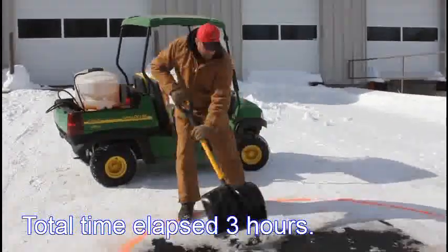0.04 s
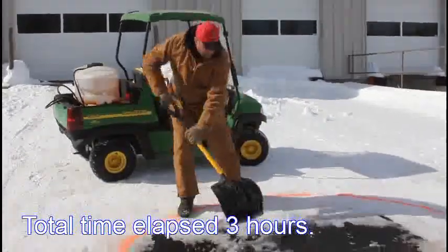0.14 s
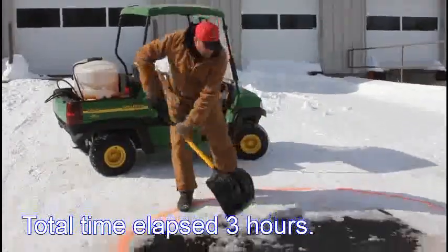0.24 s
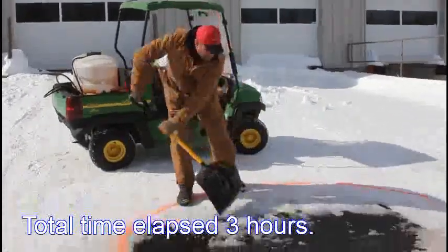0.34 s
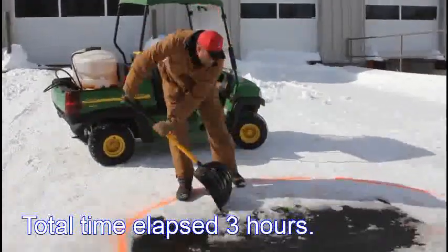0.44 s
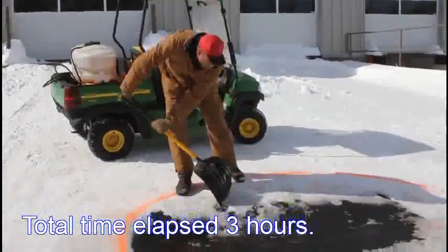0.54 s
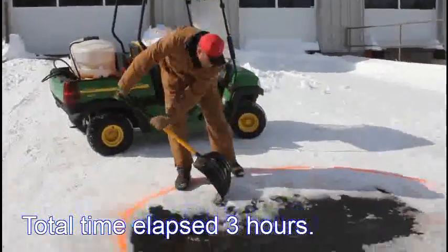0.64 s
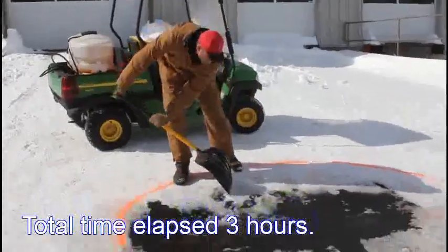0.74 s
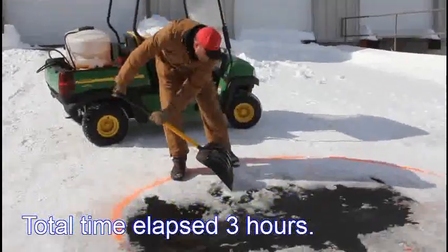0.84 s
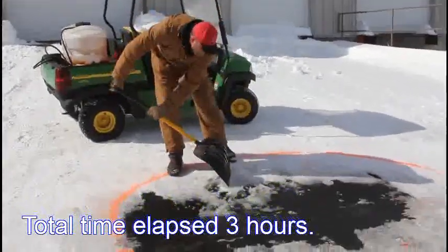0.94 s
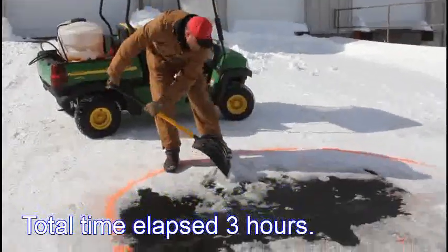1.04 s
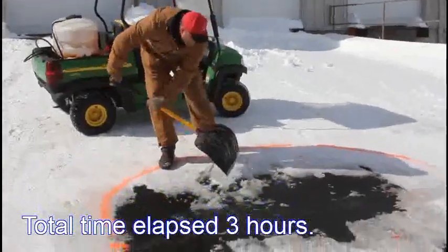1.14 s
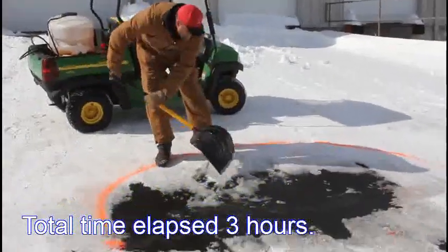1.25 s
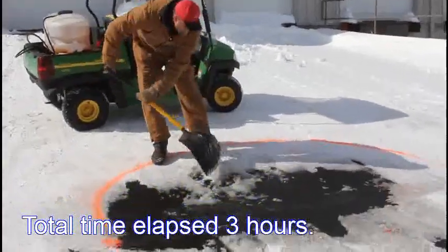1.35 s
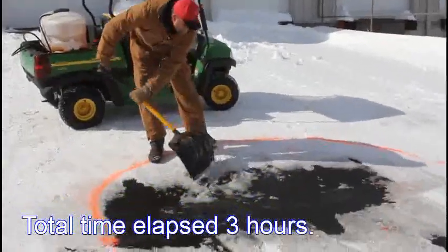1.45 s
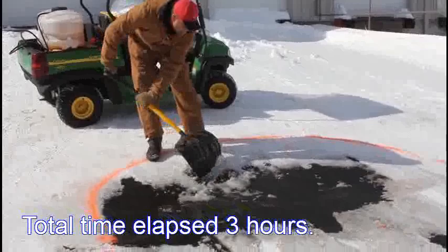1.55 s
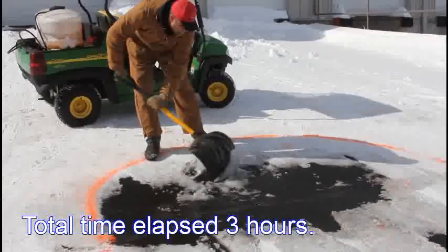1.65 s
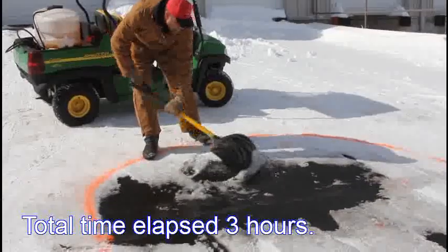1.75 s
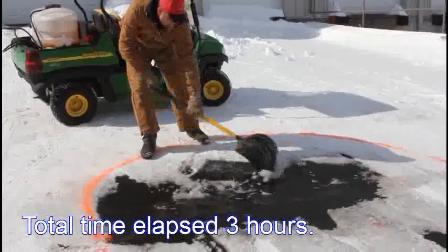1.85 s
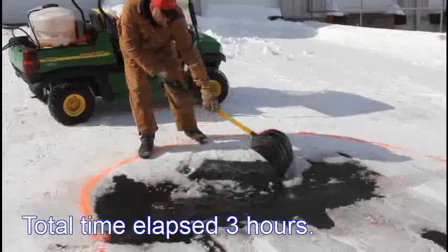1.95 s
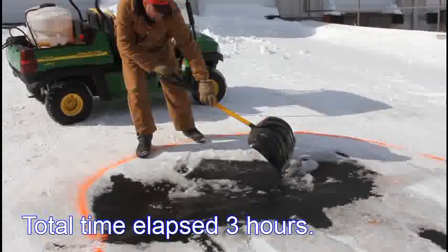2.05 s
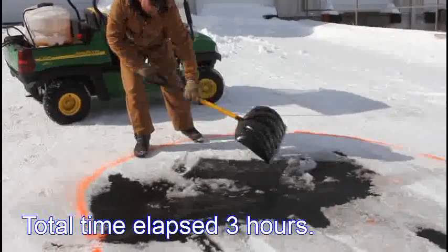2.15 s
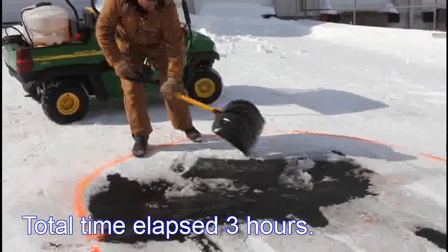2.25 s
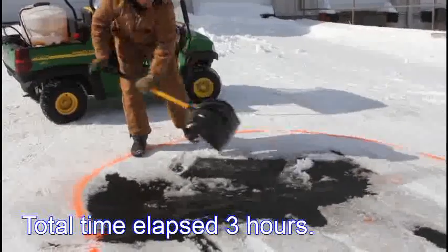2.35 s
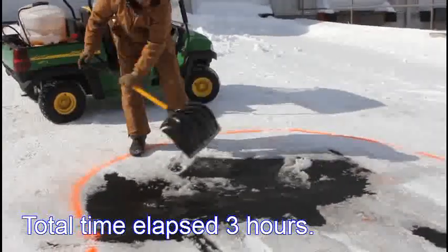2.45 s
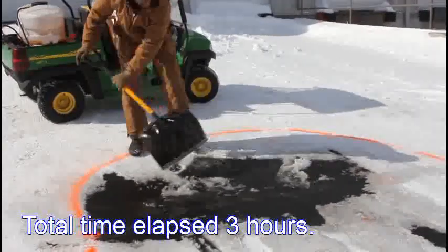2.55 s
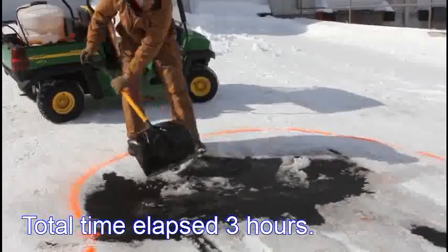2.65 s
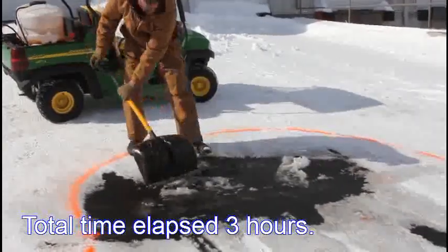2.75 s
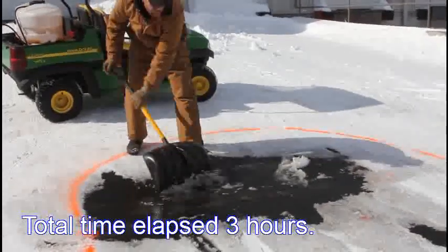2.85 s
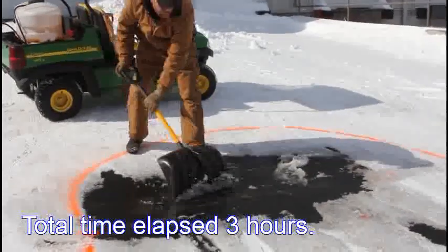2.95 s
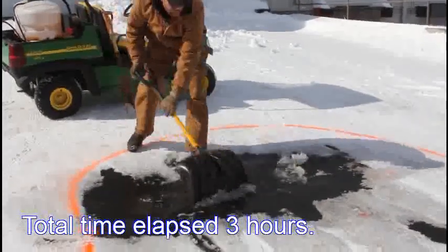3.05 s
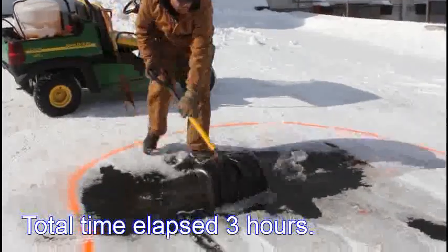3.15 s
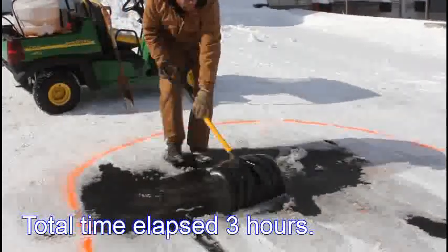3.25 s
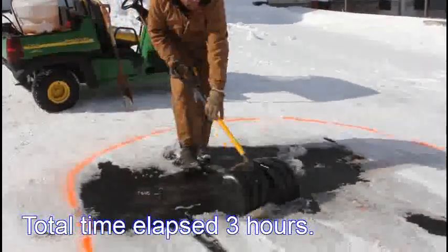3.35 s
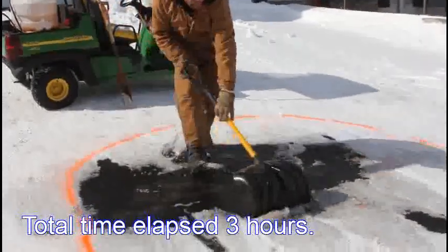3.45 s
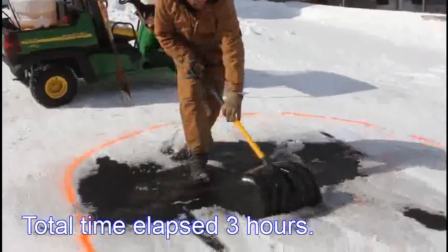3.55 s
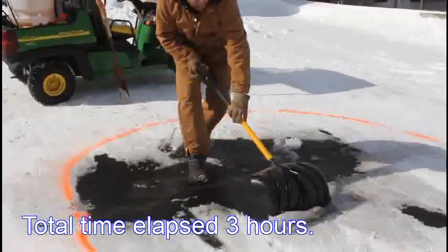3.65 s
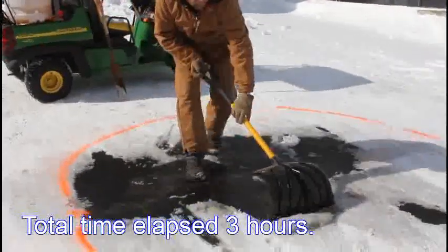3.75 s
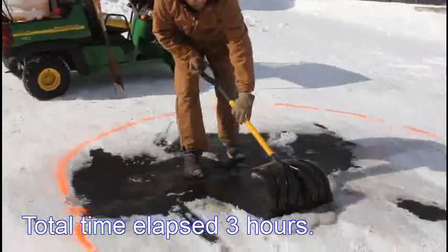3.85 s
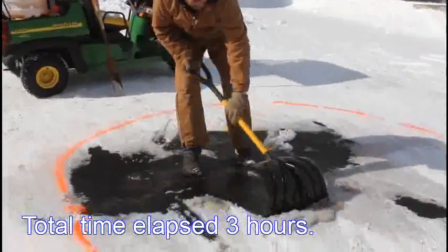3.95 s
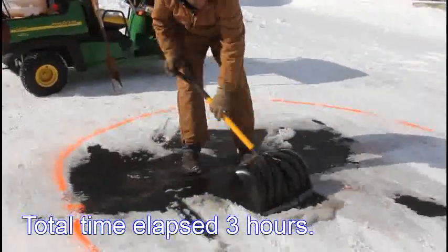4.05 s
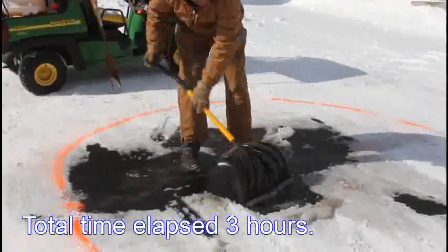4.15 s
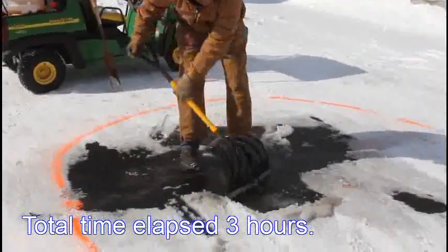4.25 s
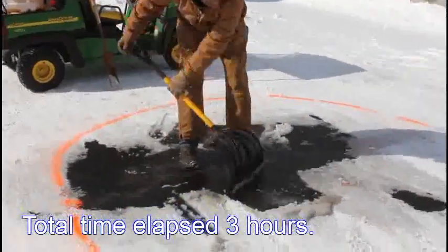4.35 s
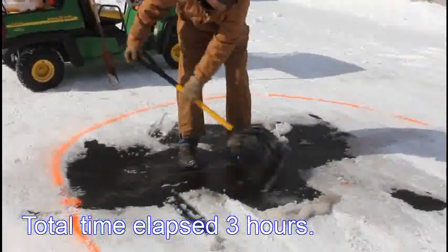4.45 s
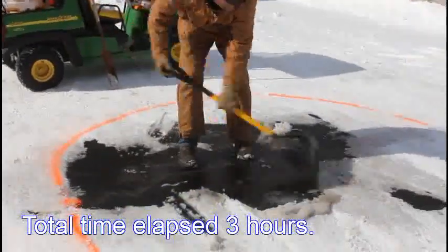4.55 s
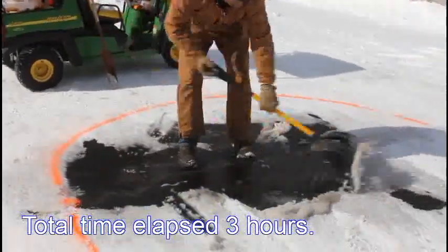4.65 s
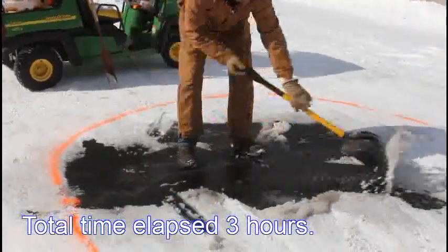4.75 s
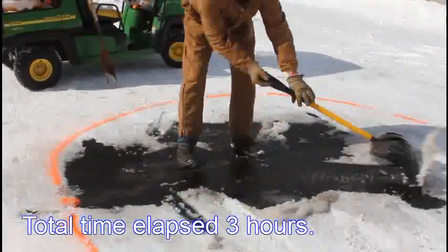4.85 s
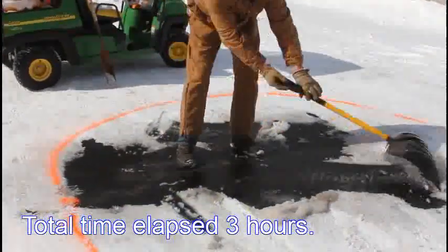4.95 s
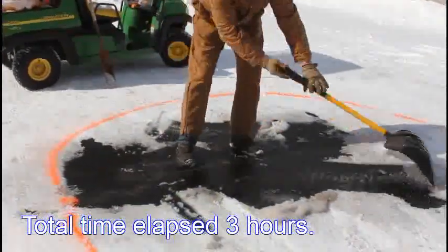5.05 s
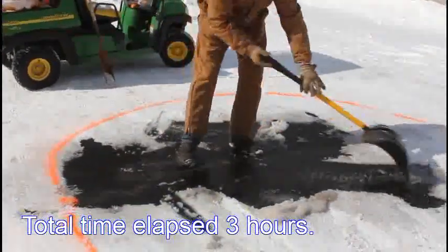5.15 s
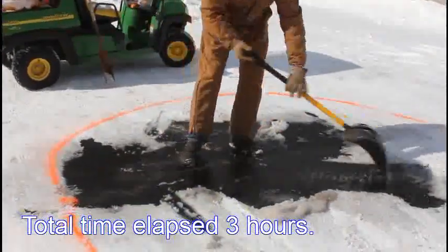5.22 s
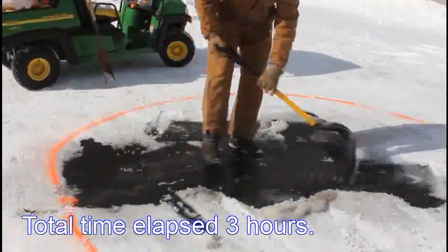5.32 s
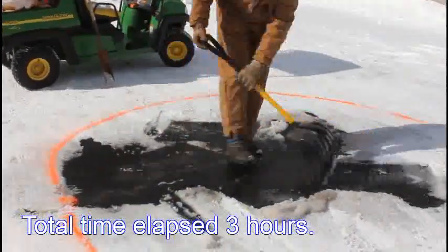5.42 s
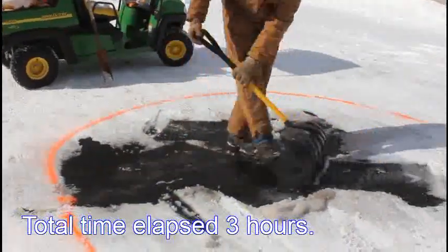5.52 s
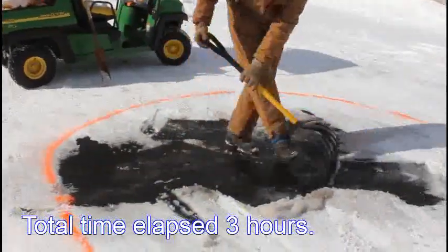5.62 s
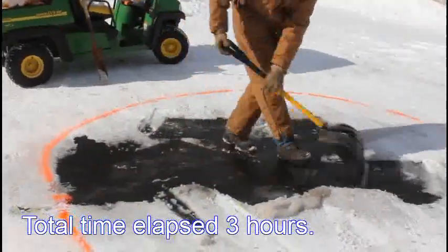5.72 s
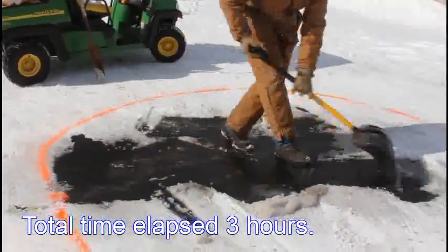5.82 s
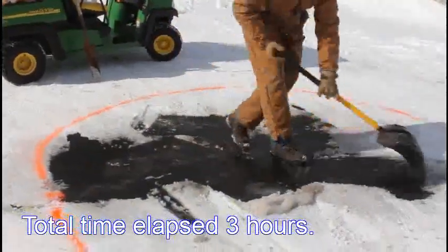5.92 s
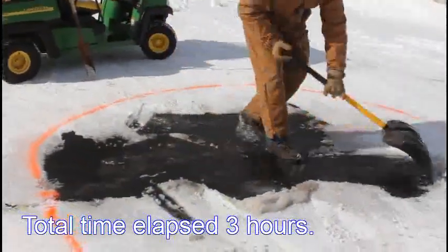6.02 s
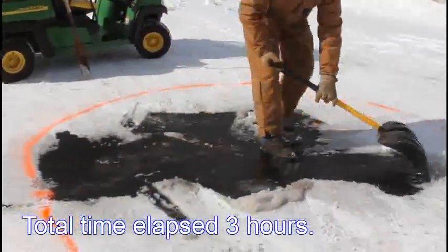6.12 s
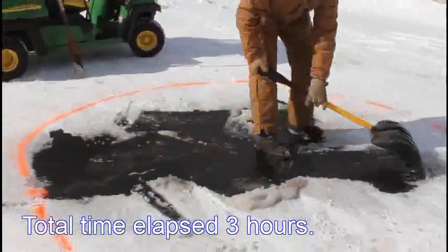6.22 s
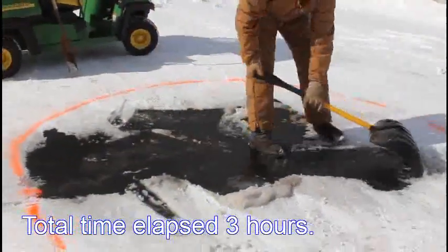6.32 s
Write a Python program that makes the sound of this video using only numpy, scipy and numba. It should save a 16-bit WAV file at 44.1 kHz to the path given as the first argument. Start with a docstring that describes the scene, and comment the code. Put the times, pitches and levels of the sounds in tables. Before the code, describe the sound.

A wide plastic scoop works slush off wet asphalt. Wind rumble and fabric rub come first, then a knock and brief scrape, dry clicks with tiny squeaks, a second short rasp, quiet ticking, and a hard clipped smack starting a long scrape. Several stuttering scrapes and a final hollow push follow. Camera microphone in the open air, wind-buffeted, dull at the top, no reverberation.

```python
"""Wind buffets the microphone and a work jacket swishes before a plastic scoop shovel lands on wet asphalt.
It is pushed in long strokes through slush and soft ice: the edge catches and slips on grit, a random
force that rings the modes of the hollow blade and its lip. Hard landings are contact pulses that overload
the recorder before its gain control reacts. Dry ticks close by are short damped tones with noise bursts,
brief squeaks are unsteady sines, and wind, cloth and open air are filtered noise."""
import sys
import numpy as np
from scipy import signal
from scipy.fft import rfft, irfft, next_fast_len
from scipy.io import wavfile
from scipy.ndimage import uniform_filter1d
from numba import njit

SR = 44100
rng = np.random.default_rng(int(sys.argv[2]) if len(sys.argv) > 2 else 0)


def wav_out(sig):
    """Save sig, one row per channel (or a flat mono array), as 16-bit PCM at SR to the path in sys.argv[1]."""
    wavfile.write(sys.argv[1], SR, np.round(np.clip(np.atleast_2d(sig).T, -1, 1) * 32767).astype(np.int16))


N = 281256
T = np.arange(N) / SR  # time axis [s]

# pushes of the shovel: (start [s], turning point of the force [s], end [s], relative level there [dB],
# rise up to the turning point, negative for a fall [dB], fall after it, negative for a rise [dB],
# relative boom of the scoop [dB], relative rasp of the edge [dB],
# loss of boom from start to end as the scoop tips, negative for a gain [dB],
# chatter [0-1], lip pitch at start [Hz], lip pitch at end [Hz], relative lip ring [dB])
PUSHES = [(0.614, 0.856, 0.975, -29, 12, 11, 5, 1, -10, 0.31, 800, 930, 5),
          (1.634, 1.892, 2.001, -20, 5.5, 5, 2, -4, 14.5, 0.43, 866, 1060, -2.5),
          (2.926, 3.24, 3.857, -23.8, -2, 2.5, 4.5, -4, -5, 0.37, 2920, 2060, -4),
          (4.041, 4.057, 4.085, -40, -1, 2, 6.5, -5.5, -2, 0.42, 1200, 1190, -1),
          (4.1, 4.12, 4.175, -29, -3, 2.5, 2.5, -6.5, -5, 0.65, 1270, 1130, 7.5),
          (4.227, 4.245, 4.5, -32.5, 0.5, 2, 3, -2, -4, .68, 770, 730, 1.5),
          (4.534, 4.6, 4.625, -20.5, 3, -4.5, 0.5, -4.5, 4, 0.39, 734, 760, 2),
          (4.638, 4.704, 5.11, -16.5, 2.5, 18, 1.5, -7, -1.5, 0.6, 1450, 2460, -1),
          (5.404, 5.422, 5.49, -44.5, 2.5, 8, 0.5, -7.5, 2, 0.27, 1490, 1490, -11),
          (5.686, 5.82, 6.154, -21.5, 4.5, 8.5, 2.5, -1.5, -2, 0.47, 745, 890, -5),
          (6.165, 6.227, 6.39, -30.5, 7, 16.5, 2, -3.5, -1, 0.47, 900, 980, -7)]
BITE_S, LIFT_S = 0.012, 0.0085  # time constants of the edge biting in and lifting off


def undb(db):
    """Definition of the decibel: amplitude gain is 10 to the power dB / 20."""
    return 10 ** (np.asarray(db) / 20)


def unit(x):
    """Normalisation by effective value: scale to rms 1."""
    return x / np.sqrt(np.mean(x ** 2))


def colour(x, points):
    """Minimum-phase filtering: folding the cepstrum of a (Hz, dB) gain curve makes it causal."""
    size = next_fast_len(len(x) + 8192, real=True) // 2 * 2
    hz, db = np.transpose(points)
    bin_hz = np.arange(size // 2 + 1) * SR / size
    gain_db = np.interp(np.log(bin_hz + 1), np.log(hz), db)
    cepstrum = irfft(np.log(undb(gain_db)))
    cepstrum[1:size // 2] *= 2
    cepstrum[size // 2 + 1:] = 0
    response = np.exp(rfft(cepstrum))
    return irfft(rfft(x, size) * response)[:len(x)]


def below(x, hz):
    """Zero-phase low-pass: filtering forwards and backwards cancels the delay."""
    return signal.sosfiltfilt(signal.butter(3, hz, fs=SR, output="sos"), x)


def walk(rate):
    """Slow random modulation: new normal levels at the given rate [1/s], joined by ramps, rms near 1."""
    hold = int(SR / rate)
    steps = np.repeat(rng.standard_normal(N // hold + 1), hold)
    return unit(uniform_filter1d(steps, hold)[:N])


def clicks(rate, spread_db):
    """Poisson-like impacts: clicks at random moments (rate per s), of uneven size."""
    struck = rng.random(N) < rate / SR
    return struck * undb(spread_db * np.clip(rng.standard_normal(N), -2, 2))


def add(out, s, sound):
    """Superposition: mix a short sound in at time s."""
    i = int(s * SR)
    out[i:i + len(sound)] += sound[:N - i]


@njit
def resonate(x, hz, width):
    """Driven damped oscillator: a state-variable band-pass with a moving centre and peak gain 1."""
    y, band, low = np.empty(len(x)), 0., 0.
    for i in range(len(x)):
        g, k = np.pi * hz[i] / SR, width / hz[i]
        v = (band + g * (x[i] + 1e-18 - low)) / (1 + g * (g + k))
        band, low, y[i] = 2 * v - band, low + 2 * g * v, k * v
    return y


@njit
def follow(size, attack, release):
    """Peak detection with two time constants: the envelope rises quickly and sinks slowly."""
    out, e = np.empty(len(size)), 0.
    for i in range(len(size)):
        e += (size[i] - e) * (attack if size[i] > e else release)
        out[i] = e
    return out


def swell(s, db, rise, fall, roundness):
    """Stretched-exponential envelope: gain grows to its top at time s and dies away again."""
    return undb(db) * np.exp(-np.maximum((s - T) / rise, (T - s) / fall) ** roundness)


def across(first, last):
    """Linear motion of a control from its first to its last value during each push."""
    start, _, end = np.transpose(PUSHES)[:3]
    return np.interp(T, np.ravel([start, end], "F"), np.ravel([first, last], "F"))


def yard():
    """Ambient noise: the faint open air over snow is broadband noise with a slowly wandering level."""
    # spectrum of the open air: (frequency [Hz], relative level [dB])
    air_spectrum = [(18, -26), (30, -13), (59, -3.5), (86, -18), (127, -4), (228, -17.5), (430, -11.5),
                    (3520, -27.5), (10300, -42), (13400, -76), (22000, -120)]
    air = unit(colour(rng.standard_normal(N), air_spectrum))
    return undb(-55.5) * air * undb(1.2 * walk(5.4))


def gusts():
    """Addition of independent powers: separate gusts rise out of a wandering breeze."""
    # gusts on the microphone: (strongest at [s], relative level [dB], rise and fall [s])
    gust_rows = [(0.0, -27, 0.023), (0.2, -30.5, 0.12), (0.43, -20, 0.085), (0.512, -13.5, 0.059),
                 (0.689, -21.5, 0.04), (0.83, -32.5, 0.16), (1.32, -39, 0.15), (1.565, -22, 0.027),
                 (2.63, -37.5, 0.093), (2.77, -30.5, 0.027), (3.019, -32.5, 0.12), (4.0, -39, 0.023),
                 (4.11, -46, .03), (4.43, -37.5, .06), (4.53, -33, 0.018), (4.95, -49, .2),
                 (5.27, -35.5, 0.038), (5.63, -39, 0.043), (6.29, -26.5, .025), (6.38, -26.5, 0.061)]
    breeze = undb(-59 + 5 * walk(9))
    gust_power = sum(swell(s, db, width, width, roundness=1.2) ** 2 for s, db, width in gust_rows)
    return np.sqrt(breeze ** 2 + gust_power)


def wind(eddy_db=-2):
    """Turbulent pressure at the microphone: gusts rumble; the strongest also shed smaller, faster eddies."""
    # spectrum of the rumble: (frequency [Hz], relative level [dB])
    rumble_spectrum = [(15, -23.5), (35, 0.5), (70, 1.5), (130, -2.5), (200, -10.5), (350, -33),
                       (700, -59.5), (2000, -56)]
    gust = gusts()
    rumble = unit(colour(rng.standard_normal(N), rumble_spectrum))
    # level the rumble so that the gust sets its strength
    rumble /= np.sqrt(uniform_filter1d(rumble ** 2, int(0.094 * SR)) + 0.024)
    eddy_spectrum = [(60, -1.5), (150, 4.5), (300, 0.0), (520, -9), (1000, -39.5), (3000, -59.5)]
    eddies = unit(colour(rng.standard_normal(N), eddy_spectrum))
    eddy_gain = undb(eddy_db) * (gust / gust.max()) ** 0.84
    return gust * (undb(1.0) * rumble + eddy_gain * eddies)


def swish(rub_width_hz=220):
    """Friction noise: canvas rubs on canvas as the arms swing, and the blade is drawn lightly back."""
    # swishes and light dragging: (strongest at [s], relative level [dB], rise [s], fall [s],
    # nominal pitch of the rub [Hz], relative rub level [dB])
    swish_rows = [(0.29, -43, 0.28, 0.41, 2200, 6), (1.09, -52, 0.017, 0.036, 1500, -13),
                  (1.42, -59.5, 0.17, .15, 1300, -6), (1.6, -47, 0.035, .04, 1500, -10),
                  (2.04, -54.5, .02, 0.16, 2900, -5), (2.9, -52.5, 0.14, .02, 1550, 10),
                  (3.9, -55, 0.017, 0.2, 1500, -12), (5.18, -49.5, 0.044, 0.11, 1600, 8),
                  (5.58, -62.5, .28, 0.2, 1600, 17.5)]
    # spectrum of the fibres: (frequency [Hz], relative level [dB])
    fibre_spectrum = [(120, 6.5), (300, 0), (900, -0.5), (1500, -2), (2300, -3.5), (3700, -6),
                      (5000, -12.5), (6500, -12.5), (9000, -19), (11000, -21.5)]
    fibres = unit(colour(rng.standard_normal(N) * undb(1.5 * walk(120)), fibre_spectrum))
    out = np.zeros(N)
    for s, db, rise, fall, hz, rub_db in swish_rows:
        shifted = np.roll(fibres, rng.integers(N))
        rub = resonate(shifted, np.full(N, float(hz)), float(rub_width_hz))
        out += swell(s, db, rise, fall, roundness=2.16) * (fibres + undb(rub_db) * rub)
    return undb(5.0) * out


def faint_ticks(spread_db=8.5):
    """Random scatter: faint ticks fall at uniformly drawn moments, levels and pitches."""
    # spans of faint ticks: (from [s], to [s], ticks [1/s], middle relative level [dB])
    spans = [(0.93, 1.129, 60, -40), (1.252, 1.6, 60, -36), (2.35, 2.881, 20, -39.5),
             (3.89, 4.021, 40, -55)]
    rows = []
    for start, end, rate, db in spans:
        for when, size, pitch, snap in rng.random((int((end - start) * rate), 4)):
            peak_db = db + spread_db * (2 * size - 1)
            rows.append((start + when * (end - start), peak_db, 750 + 900 * pitch, peak_db - 10 - 16 * snap))
    return rows


def ticks(swell_s=0.00057, snap_s=0.00078, rattle_s=0.0063):
    """Heavily damped vibration: a dead knock of about two cycles, a tiny bright snap and a faint rattle."""
    # dry ticks: (time [s], relative knock level [dB], pitch [Hz], relative snap level [dB])
    tick_rows = [(0.962, -13.5, 870, -14.5), (0.974, -14, 940, -21), (1.0758, -15.5, 785, -47),
                 (1.0805, -14, 737, -29), (1.1116, -19.5, 1140, -37), (1.193, -38, 1030, -30),
                 (1.204, -33, 1180, -30), (1.223, -31, 1160, -41), (1.2349, -22, 1140, -31.5),
                 (1.2446, -29, 1170, -39), (1.2822, -22.5, 1190, -31), (1.286, -16.5, 1070, -21.5),
                 (1.307, -22, 810, -35), (1.311, -25, 1420, -22), (1.3287, -29, 1113, -30),
                 (1.3462, -23.5, 1300, -45), (1.3615, -27, 781, -33.5), (1.4128, -15.5, 1170, -29),
                 (1.5637, -21, 1270, -29.5), (1.5992, -19.5, 990, -35), (2.3329, -20, 1090, -38.5),
                 (2.4488, -29.5, 705, -63), (2.4872, -28, 640, -56), (2.613, -20.5, 950, -33.5),
                 (2.722, -27.5, 1180, -55), (2.8504, -22, 1450, -27), (2.8573, -19.5, 1240, -42),
                 (2.8986, -21, 930, -48), (3.9435, -22.5, 563, -44), (3.978, -25, 1090, -34),
                 (5.1306, -26.5, 1340, -33), (5.6411, -24.5, 1440, -51)]
    knocks, snaps, rattles, t = np.zeros(N), np.zeros(N), np.zeros(N), T[:SR // 25]
    knock_shape = (t / swell_s * np.exp(1 - t / swell_s)) ** 2
    for s, db, hz, snap_db in list(tick_rows) + faint_ticks():
        add(knocks, s, undb(db) * np.sin(2 * np.pi * hz * t) * knock_shape)
        add(snaps, s, undb(snap_db) * rng.standard_normal(len(t)) * np.exp(-t / snap_s))
        add(rattles, s, undb(db) * rng.standard_normal(len(t)) * np.exp(-t / rattle_s))
    snaps = colour(snaps, [(800, 4), (2800, 7), (3900, 4), (4900, 8.5), (6600, -10.5), (8000, -28), (11000, -40)])
    rattles = colour(rattles, [(100, -6.5), (500, 5), (1300, -1.0), (1900, -23.5), (2800, -17.5), (6000, -37)])
    return undb(1.0) * knocks + snaps + rattles


def squeaks():
    """Phase-modulated tone: brief chirps whose randomly wandering phase makes them slightly unsteady."""
    # tiny squeaks: (time [s], level [dB], pitch [Hz], length [s])
    squeak_rows = [(0.951, -26, 4860, .006), (1.299, -42, 4870, .022), (2.717, -48, 4460, 0.0049),
                   (2.718, -41, 2250, 0.0041)]
    out = np.zeros(N)
    for s, db, hz, length in squeak_rows:
        t = T[:int(length * SR)]
        phase = 2 * np.pi * hz * t + np.cumsum(0.063 * rng.standard_normal(len(t)))
        add(out, s, undb(db) * np.sin(phase) * np.sin(np.pi * t / length))
    return out


def grit(rate=12000):
    """Shot noise: tiny impacts of stones and ice crystals with random sign; rms 1."""
    return unit(clicks(rate, spread_db=3.5) * rng.choice([-1, 1], N))


def blade(pressure, thump, flex=0.015):
    """Modal superposition: grit along the wide edge drives each mode differently; flexing detunes them."""
    # modes of the blade: (mean frequency [Hz], width [Hz], relative level [dB])
    modes = [(241, 65, -5.5), (300, 17.8, 6.5), (340.5, 45, 2), (411, 15.7, -2), (502, 75, -9),
             (704, 27.7, -1.5), (782, 41, -6.5), (986, 39, -6.5), (1063, 84, -11.5), (1393, 38, -10),
             (1508, 25, -10.5), (1872, 55, -14.5), (2300, 110, -19), (2614, 31, -26), (3270, 510, -18),
             (3480, 300, -30.5), (3730, 48, -16.5)]
    # the crowd of small modes between them: (frequency [Hz], relative level [dB])
    small_modes = [(80, -32), (170, -19.5), (260, -11.5), (750, -12), (1200, -18), (1600, -18),
                   (2300, -18.5), (3700, -15.5), (4300, -23), (5100, -27.5), (7500, -26), (9200, -29.5),
                   (11000, -28.5)]
    out, stones = colour(pressure * grit(), small_modes), grit()
    for hz, width, db in modes:
        tuned_hz = SR / np.pi * np.tan(np.pi * hz / SR)  # offsets the resonator's frequency warping
        centre = tuned_hz * (1 + flex * walk(9))
        force = pressure * np.roll(stones, rng.integers(N)) + thump
        out = out + undb(db) * resonate(force, centre, float(width))
    return out - below(out, 159)  # an open scoop radiates little bass


def effort():
    """Contact force: each push bites in, changes force up to and after its turning point, and lifts off."""
    out = np.zeros(N)
    for start, turn, end, db, rise_db, fall_db, *_ in PUSHES:
        contact = np.exp(-np.maximum(start - T, 0) / BITE_S - np.maximum(T - end, 0) / LIFT_S)
        push_db = np.interp(T, [start, turn, end], [db - rise_db, db, db - fall_db])
        out = np.maximum(out, contact * undb(push_db))
    return out


def scrape(catch_rate=240, slip_s=0.0036, judder_hz=56):
    """Stick-slip friction: the edge catches on stones, and each slip frees a burst of tiny impacts."""
    snag_rate, snag_s, snag_db = 33, 0.0055, -0.5  # larger stones: jolts [1/s], decay [s], relative size [dB]
    glide_db, chatter_per_db = -23.5, 0.05  # above this load the edge chatters less and less
    stutter_db, stutter_hz = 2.5, 30  # the push is uneven, the more so the more the edge chatters
    start = np.transpose(PUSHES)[0]
    boom_db, rasp_db, tip_db, rough = np.transpose(PUSHES)[6:10]
    slips = signal.lfilter([1], [1, -np.exp(-1 / (slip_s * SR))], clicks(catch_rate, spread_db=2))
    snags = signal.lfilter([1], [1, -np.exp(-1 / (snag_s * SR))], clicks(snag_rate, spread_db=5.5))

    load = effort()
    excess_db = 20 * np.log10(np.maximum(load / undb(glide_db), 1))
    chatter = np.clip(across(rough, rough) - chatter_per_db * excess_db, 0, 1)
    # under light load the whole blade also hops, in uneven cycles that start sharply
    hop_cycles = np.cumsum(judder_hz * np.exp(.3 * walk(50))) / SR
    hops = np.exp(-(hop_cycles % 1) / 0.18)
    judder = chatter ** 2
    slipping = 1 - chatter + chatter * unit(slips)
    hopping = 1 - judder + judder * unit(hops)
    sound = blade(slipping * hopping + judder * undb(snag_db) * unit(snags), 0)

    low, low_and_mid = below(sound, 863), below(sound, 2570)
    boom, middle, rasp = unit(low), unit(low_and_mid - low), unit(sound - low_and_mid)
    push = load * undb(stutter_db * chatter * walk(stutter_hz))
    # a flat, loaded scoop booms; a steep, bare edge rasps; tipping it up thins both
    tipped_db = across(tip_db / 2, -tip_db / 2)
    # the bare edge rasps more until slush builds up in front of it
    bare_db = 4 * np.max([swell(s, 0, BITE_S, 0.084, roundness=0.98) for s in start], axis=0)
    boom_gain = undb(across(boom_db, boom_db) + tipped_db)
    rasp_gain = undb(across(rasp_db, rasp_db) + 0.63 * tipped_db + bare_db)  # rasp shares 0.63 of the loss
    return undb(-2.97) * push * (undb(-3.0) * middle + boom_gain * boom + rasp_gain * rasp)


def blows(thump_db=-2, contact_s=0.0015):
    """Impact excitation: one firm half-sine push on the scoop, and a short crunch of ice under it."""
    # the blade lands or snags: (time [s], relative level [dB], treble gain [dB],
    # decay of the crunch [s], relative thump level [dB])
    blow_rows = [(0.525, -9, 0.5, 0.0056, -7.5), (0.902, -14.5, 6.5, 0.014, -24),
                 (0.914, -6.5, 3, 0.0069, -16), (1.108, -27, -3, 0.023, -18),
                 (1.1439, -7.5, -5, 0.0068, -18), (1.153, -11.5, 4.5, 0.0037, -11),
                 (1.461, -31.5, 3, 0.025, -26), (1.614, -0.5, 0.5, 0.0046, -10.5),
                 (1.649, -7, -1, 0.0063, -4), (2.004, -20, 3, 0.0097, -9), (2.9105, 2, 7, 0.0038, -7.5),
                 (2.9153, 2.5, 3, 0.0035, -11), (2.997, -16, 8.5, 0.0095, -10),
                 (3.932, -28, -6, 0.019, -15), (4.281, -18.5, 0, 0.011, -28), (4.338, -17, 7, 0.0037, -27),
                 (4.377, -17, 2.5, 0.0068, -18), (4.412, -18.5, 6, 0.0081, -29),
                 (4.5317, -16, 4, 0.0025, -28), (5.036, -11, -7, 0.0026, -30),
                 (5.4829, -16, -3, 0.0058, -3), (5.584, -17.5, -4, 0.018, -5)]
    crunch, thump, treble, t = np.zeros(N), np.zeros(N), np.ones(N), T[:SR // 8]
    half_sine = np.sin(np.pi * np.minimum(t / contact_s, 1))
    for s, db, treble_db, length, weight_db in blow_rows:
        add(crunch, s, undb(db) * np.exp(-t / length))
        add(thump, s, undb(db + weight_db + thump_db) * half_sine)
        treble[int(s * SR):] = undb(treble_db)  # holds until the next blow
    sound = blade(crunch, thump)
    dull = below(sound, 2600)
    return undb(13.0) * (dull + treble * (sound - dull))


def shovel(lip_width_hz=170):
    """Resonant colouring: the lip rings with scrapes and blows, its pitch following its angle to the ground."""
    sound = scrape() + blows()
    first_hz, last_hz, ring_db = np.transpose(PUSHES)[10:]
    lip = resonate(sound, across(first_hz, last_hz), float(lip_width_hz))
    return sound + undb(across(ring_db, ring_db)) * lip


def scene():
    """Linear superposition of shovel, clothing and weather; the snow gives no echo."""
    return (shovel() + ticks() + squeaks() + swish() + wind() + yard())[None]


def record(dry):
    """Dynamic compression: gain evens out strokes but lags sudden blows, which clip; high treble is cut."""
    threshold_db, ratio = -22, 2.5
    attack_s, release_s = 0.004, 0.037
    sound = below(dry[0], 9800)
    heard = np.abs(sound - below(sound, 190))  # rumble hardly moves the gain
    envelope = follow(heard, 1 / (attack_s * SR), 1 / (release_s * SR))
    gain = np.maximum(envelope / undb(threshold_db), 1) ** (1 / ratio - 1)
    ceiling = undb(-9.1)
    clipped = np.clip(gain * sound, -ceiling, ceiling)
    low_pass = signal.cheby1(12, .2, 9900, fs=SR, output="sos")
    return signal.sosfilt(low_pass, clipped)[None]


dry = scene()
out = record(dry)
wav_out(out)
```